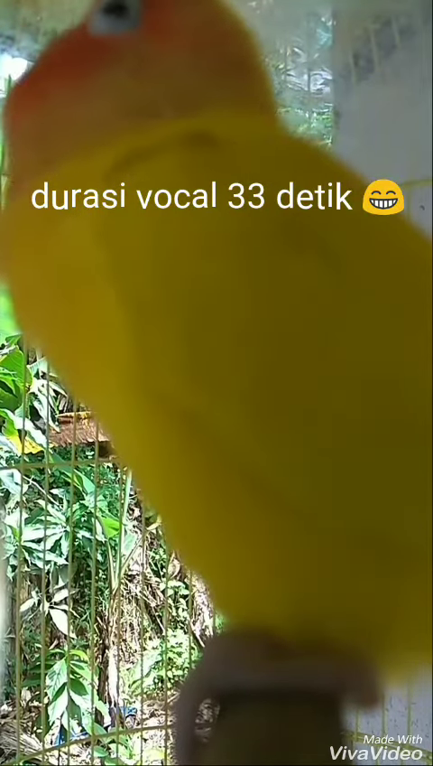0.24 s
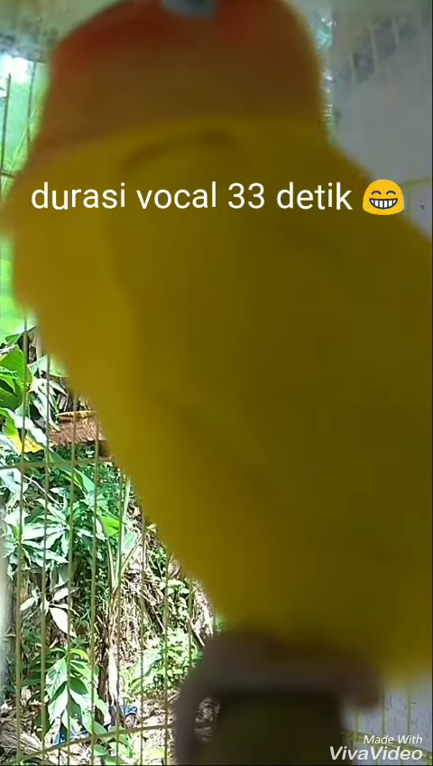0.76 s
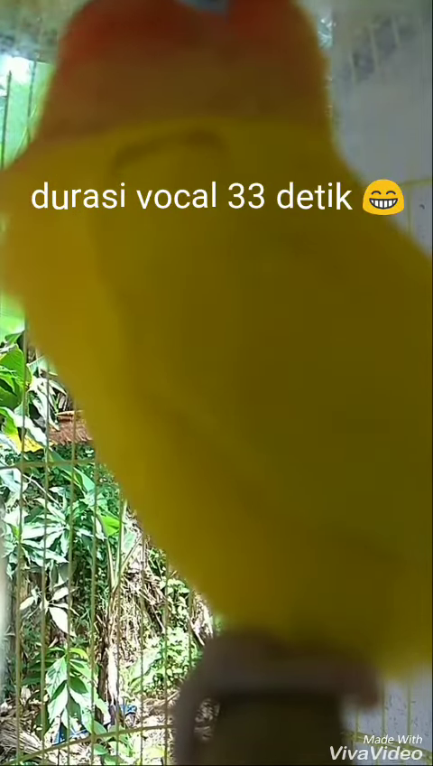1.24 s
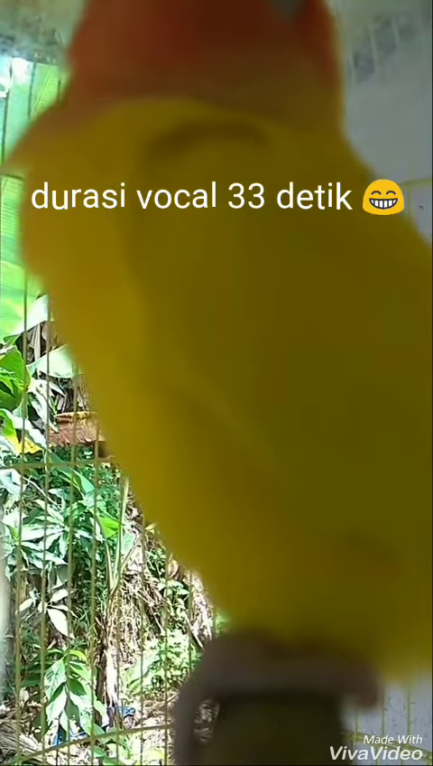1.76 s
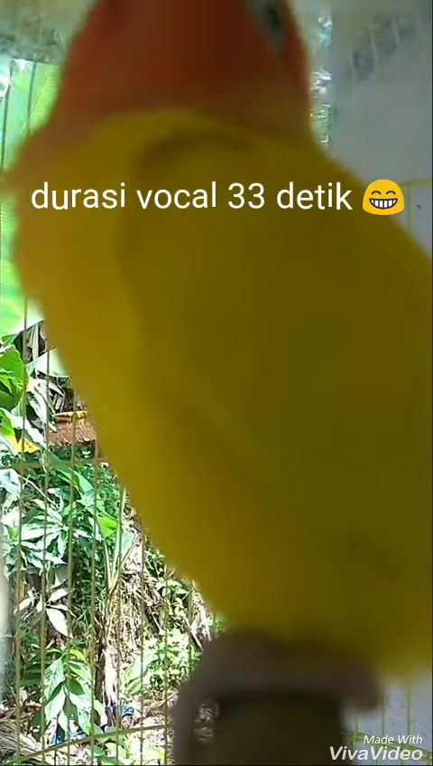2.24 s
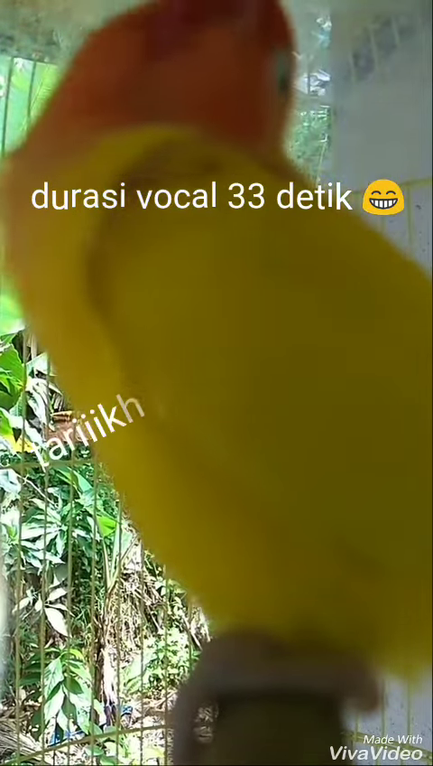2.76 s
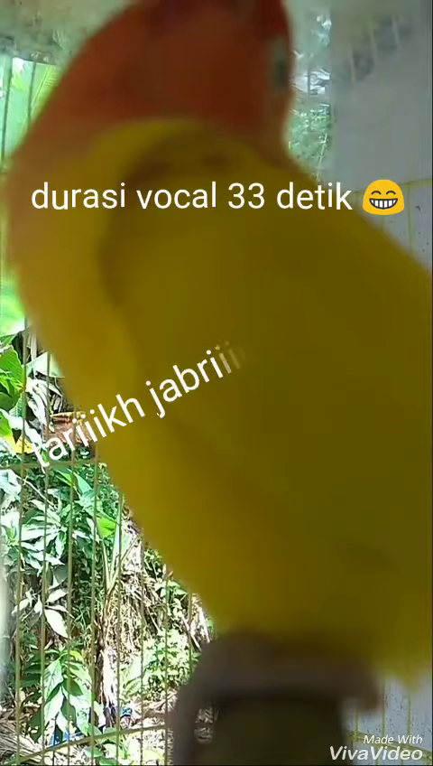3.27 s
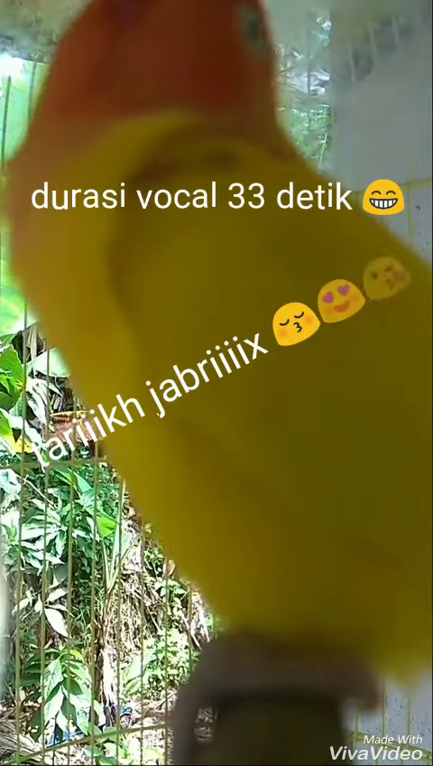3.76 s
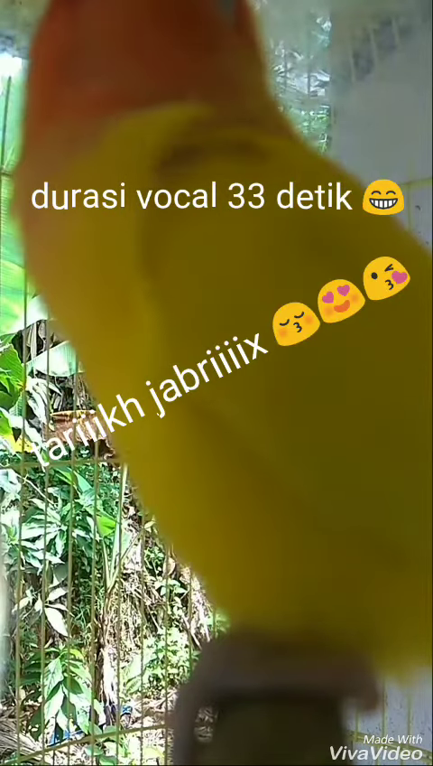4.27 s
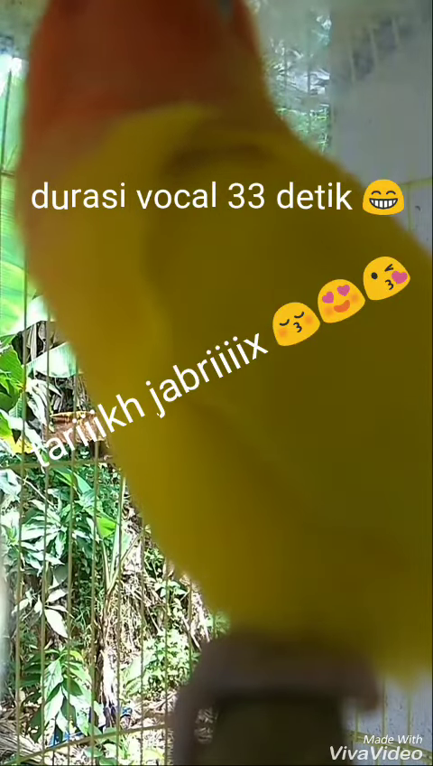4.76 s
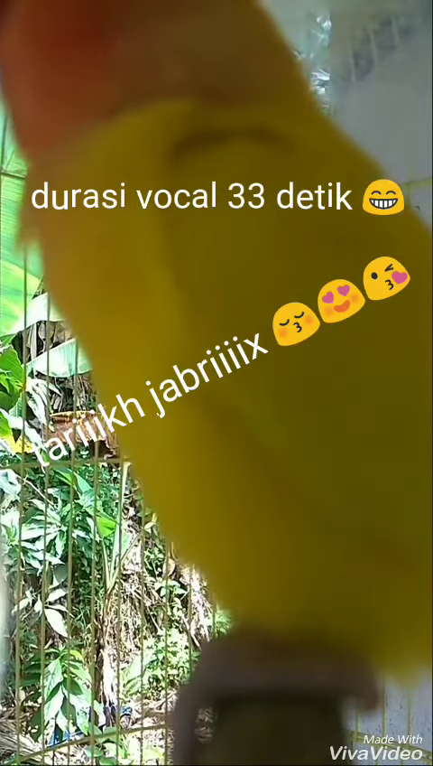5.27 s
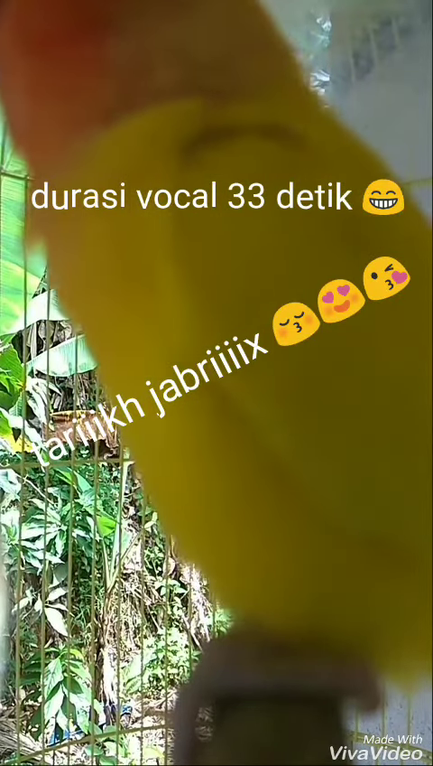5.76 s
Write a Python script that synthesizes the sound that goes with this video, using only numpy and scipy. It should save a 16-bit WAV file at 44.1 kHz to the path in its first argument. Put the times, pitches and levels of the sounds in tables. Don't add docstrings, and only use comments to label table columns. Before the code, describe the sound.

A small parrot right at the microphone rattles out fast, harsh, high chirps about ten a second, slows, then falters into sparse faint ticks.

```python
import sys
import numpy as np
from scipy import signal
from scipy.fft import rfft, irfft, next_fast_len
from scipy.io import wavfile
from scipy.ndimage import uniform_filter1d

SR = 44100
rng = np.random.default_rng(int(sys.argv[2]) if len(sys.argv) > 2 else 0)


def ratio_of_db(decibels):
    return 10 ** (np.asarray(decibels, float) / 20)


def unload_audio(sound):
    columns = np.transpose(np.atleast_2d(sound))
    steps = np.round(np.clip(columns, -1, 1) * 32767)
    wavfile.write(sys.argv[1], SR, steps.astype(np.int16))


N = 265393

# (time [s], scoop [ms], hold [ms], level [dB], jump pitch [Hz])
ARCHES = [
    (-.037, 16.4, 21, -11.5, 4754),
    (0.046, 19.4, 21.8, -12.5, 4780),
    (0.149, 13.7, 18.2, -12, 4728),
    (0.239, 10, 23.5, -13, 4750),
    (.333, 16.4, 22.3, -13, 4795),
    (.434, 11.1, 28.3, -14, 4670),
    (.531, 18, 20, -11.5, 4490),
    (0.632, 11.9, 20.6, -12, 4499),
    (.727, 9, 24, -15, 4987),
]
# (time [s], fall [ms], rest [ms], level [dB], start [Hz])
FALLS = [(0.851, 26, 5.7, -13, 2620), (.940, 30, 10, -14, 2641), (1.038, 20, 14.3, -16.5, 2505),
         (1.131, 26, 5.1, -15.5, 2520), (1.22, 26, 4.1, -11.5, 2632), (1.322, 17, 14.9, -13.5, 2505),
         (1.416, 19, 12.9, -13, 2824), (1.519, 12, 8, -11.5, 2606), (1.615, 19, 3.1, -11.5, 2511),
         (1.700, 20, 5, -11, 2497), (1.792, 18, 8.1, -9, 2620)]
# (time [s], scoop [ms], whistle [ms], level [dB], whistle pitch [Hz])
SNAPS = [
    (1.977, 26.9, 18.5, -10.5, 4350),
    (2.095, 13, 19, -10.5, 4640),
    (2.194, 6.95, 25.9, -10, 4780),
    (2.301, 8.3, 18, -8, 5050),
    (2.399, 12, 17, -10.5, 4830),
    (2.499, 8, 24.2, -10.5, 4600),
    (2.599, 9.8, 29.5, -10.5, 4500),
    (2.715, 10.4, 31.9, -12.5, 4050),
]
# (time [s], scoop start [Hz], scoop chaos [0-1], whistle chaos [0-1])
SNAP_SCOOP = [(1.98, 2450, 0.61, 0.16), (2.099, 2056, 0.61, 0.14), (2.5, 2100, .55, .4),
              (2.62, 2803, 0.39, 0.64), (2.72, 3134, 0.72, .5)]
# (time [s], glide [ms], break and step [ms], level [dB], step pitch [Hz])
STEPS = [(2.823, 22, 22.6, -12, 4416), (2.946, 21.7, 26.06, -14.5, 4337), (3.075, 19.6, 27.7, -13.5, 4177),
         (3.191, 31.3, 30.4, -13.5, 4265), (3.313, 20.3, 33, -13, 4090), (3.442, 22.3, 29, -13, 4105),
         (3.568, 28.8, 21.3, -14, 4052), (3.696, 24.4, 30.5, -16, 4140), (3.842, 24.5, 26.2, -14.5, 3980),
         (3.984, 24.2, 32.2, -16, 3938), (4.126, 23, 13.4, -15, 3830), (4.237, 31.6, 23, -17, 3856),
         (4.379, 30, 24, -17.5, 3910), (4.518, 34.2, 23, -18.5, 3717), (4.66, 20.4, 28.5, -17, 3837),
         (4.813, 35, 21, -14.5, 3892)]
# (time [s], glide start [Hz], glide chaos [0-1], glide level re step [dB], step chaos [0-1])
TIRING = [(2.8, 3329, .3, -2, .25), (3.0, 3350, 0.2, 2, 0.12), (3.3, 3155, 0.25, -3.5, 0.17),
          (3.85, 3242, 0.17, 0, .15), (3.998, 3043, 0.26, -5, .15), (4.55, 2943, 0.42, -1.5, 0.25),
          (4.85, 3043, 0.26, -4, 0.25)]
# (time [s], length [ms], level [dB])
LEADS = [(2.941, 6, -18), (3.433, 7.5, -23.5), (3.832, 11.6, -21), (3.976, 5.9, -23), (4.110, 12.2, -33.5),
         (4.228, 9, -34), (4.362, 10, -37.5), (4.371, 9.1, -22.5), (4.504, 14, -28), (4.648, 10, -17.5),
         (4.802, 7.1, -15.5)]
# (time [s], length [ms], level [dB], pitch [Hz])
TICKS = [(.823, 11.1, -15.5, 2080), (.838, 12, -18, 2080), (.914, 9.6, -13.5, 2210),
         (.926, 17.7, -21.5, 3800), (0.999, 10.5, -22.5, 3900), (1.098, 13.2, -21.5, 1630),
         (1.188, 9.2, -15.5, 1570), (1.388, 4.07, -22, 1600), (1.482, 5.03, -17, 1670),
         (1.584, 4.83, -24, 1700), (1.672, 5.2, -14, 2000), (1.760, 17.6, -20, 1670),
         (1.857, 3.68, -22, 1590), (1.867, 2.8, -11, 2230), (1.883, 10, -12, 3390),
         (1.898, 13.8, -11, 2500)]
# (time [s], length [ms], level [dB], pitch [Hz])
FALTER = [(4.956, 12.5, -19, 2133), (5.019, 3.8, -33, 1595), (5.12, 2.82, -28.5, 1597),
          (5.150, 5.1, -24.5, 1595), (5.229, 7.1, -16, 1655), (5.402, 4, -43, 1636),
          (5.426, 5.6, -25.5, 1397), (5.495, 4.45, -47, 1609), (5.523, 6.2, -21, 1469),
          (5.603, 2.8, -38.5, 1611), (5.631, 4.66, -20.5, 1325), (5.716, 4.5, -41, 1587),
          (5.745, 8.2, -20.5, 1645), (5.844, 4, -35.5, 1610), (5.872, 6.7, -19.5, 1596),
          (5.969, 4.4, -22.5, 1532)]
# (time [s], pitch [Hz], level [dB])
SECOND_VOICE = [(0, 4646, -28), (.78, 4600, -19), (.84, 4600, -33)]
# (frequency [Hz], gain [dB])
THROAT = [(300, -27.5), (1200, -14), (2150, -11), (2700, -8.5), (3400, -1.5), (4600, -9), (5400, -7.5),
          (6000, -12), (6700, -3), (8000, -10.5), (10800, -4.5), (12300, -6.5), (14000, -30.5)]
# (time [s], treble of the facing beak [dB], left minus right low [dB], left minus right high [dB])
HEAD = [(0.0, 3, -4, -4), (0.6, 5.5, -3, -3), (0.9, 3.5, -1.5, -1.7), (1.5, 0, -6, -0.3),
        (1.81, 7, -2, -2.3), (2.11, 1.2, -3, -0.5), (2.41, 7, -5.2, 0.5), (2.71, 0.7, -6.5, 0.7),
        (3.31, 0.5, -10.5, -1), (3.91, -2, -6, -4), (4.51, -6, -6.5, -5), (5.12, 0.5, -5.5, -4.5),
        (5.42, 1, -17, -11.5), (6.02, -0.5, -13.5, -10)]
# (frequency [Hz], gain [dB])
SHADOW = [(4700, 6.5), (5800, -6.5), (7200, 6), (11200, 2.5), (12400, -28)]
# (frequency [Hz], phase [rad])
PORTS = [(0, 0.5), (1720, -4.74), (2410, -2.5), (3530, -1.11), (4650, -1), (5340, -3.5), (6030, -3),
         (7840, -1), (8530, -0.1), (8790, 3), (9730, 4.5), (10700, 4.5), (11400, 5), (13600, -0.86)]
# (time [s], exhaust level [dB], road level [dB])
ENGINE = [(0, -81, -48.5), (.75, -77, -59), (.87, -54, -40), (1.2, -64, -46), (1.8, -64.5, -52),
          (2.5, -98.5, -76), (3.5, -69.5, -77.5), (4.4, -56.5, -50.5), (5.1, -52.5, -49.5),
          (5.3, -55, -55.5), (5.5, -49, -53.5), (6.02, -56, -53)]
# (multiple of the firing rate [-], level [dB])
EXHAUST = [(4, -3), (5, 0), (6, -4.5), (13, -7.5), (15, -13.5), (16, -7.5)]
# (time [s], pitch [Hz], level [dB])
WHINE = [
    (5.35, 333.6, -73),
    (5.5, 337.9, -66.5),
    (6.02, 348.7, -64.5),
]
# (frequency [Hz], gain [dB])
AIR = [(25, 6.5), (100, -1), (400, 9), (1500, -4), (4000, -45), (14000, -7)]

SCOOP_HZ, SCOOP_END_HZ, SCOOP_DB, SCOOP_CHAOS = 2027, 2610, -4.5, 0.58
HOLD_HZ, HOLD_RISE, HOLD_CHAOS = 2668, 1.018, 0.2
JUMP_MS, JUMP_DB, JUMP_CHAOS = 14.5, -0.5, 0.393
SLACK_HZ, FALL_CHAOS = 1815, 0.33
ROUGH_SHARE, ROUGH_DB, ROUGH_CHAOS = 0.33, -2, 0.7
REST_DB, REST_CHAOS = -4.5, 0.41
SNAP_RISE, SNAP_DB, WHISTLE_FADE_DB = 1.18, -3, -3
HOOK_RISE = 1.07
GLIDE_RISE, STEP_RISE = 1.11, 1.03
BREAK_SHARE, BREAK_DB, BREAK_CHAOS = 0.32, -1.5, 0.55
LEAD_HZ, LEAD_RISE, LEAD_CHAOS = 1700, 1.1, 0.36
TICK_HEAD, TICK_HEAD_DB, TICK_END_DB = 0.5, 2, -4
TICK_CHAOS, FALTER_CHAOS = 0.59, 0.496
RELEASE_S, RELEASE_DB = 0.002, -10.5
PORCH_T60_S, PORCH_DB, WALL_S, WALL_DB = 0.32, -15.5, 0.0151, -21
FIRING_HZ, AIR_DB = 32.65, -60.5


def colour(x, shape):
    hz, db = np.transpose(shape)
    size = next_fast_len(x.shape[-1] + 4096)
    f = np.fft.rfftfreq(size, 1 / SR) + 1
    gain = ratio_of_db(np.interp(np.log(f), np.log(hz), db))
    return irfft(rfft(x, size) * gain, size)[..., :x.shape[-1]]


def unit(x):
    return x / np.sqrt(np.mean(x ** 2))


def wobble(hz):
    slow = signal.butter(2, hz, fs=SR, output="sos")
    return unit(signal.sosfilt(slow, rng.standard_normal(N)))


def at(s, table):
    times, *columns = np.transpose(table)
    return [np.interp(s, times, c) for c in columns]


def curves(table):
    return at(np.arange(N) / SR, table)


def smooth(x, ms):
    return uniform_filter1d(uniform_filter1d(x, max(int(ms * SR / 1000), 1)), 20)


def syrinx():
    hz, push, chaos = controls()
    drift = (0.005 + 0.02 * chaos) * wobble(250) + 0.06 * chaos ** 2 * wobble(1500)
    phase = 2 * np.pi * np.cumsum(hz * (1 + drift)) / SR
    throat_hz, throat_db = np.transpose(THROAT)
    tone, power = 0, 1e-9
    for k in np.arange(0.5, 10.1, 0.5):
        size = ratio_of_db(np.interp(np.log(k * hz), np.log(throat_hz), throat_db)) * (k * hz < 15000)
        if k % 1:
            size = size * (0.046 + 0.5 * chaos ** 3.6)
        throb = wobble(353)
        size = size * ratio_of_db((0.6 + 0.7 * k + 2.4 * chaos) * throb)
        jitter = max(k - 1, 0) * 0.29 * np.roll(throb, 999)
        tone = tone + size * np.sin(k * phase + k * k + jitter)
        power = power + uniform_filter1d(size ** 2, 400) / 2
    breath = unit(colour(rng.standard_normal(N), THROAT))
    share = np.clip(0.015 + 0.42 * chaos ** 2.3, 0, 1)
    voice = np.sqrt(1 - share) * tone / np.sqrt(power) + np.sqrt(share) * breath
    flutter = ratio_of_db((0.7 + 2.0 * chaos) * wobble(226))
    return push * flutter * (voice + second_voice())


def second_voice():
    hz, db = curves(SECOND_VOICE)
    phase = 2 * np.pi * np.cumsum(hz * (1 + 0.034 * wobble(333))) / SR
    return ratio_of_db(db + 11.3 * wobble(100)) * (np.sin(phase) + 3.83 * np.sin(2 * phase))


def controls():
    hz, push, chaos = np.full(N, 2000.0), np.zeros(N), np.full(N, 0.5)
    for s, ms, db, hz0, hz1, rough in strokes():
        i, n = max(int(s * SR), 0), max(int(ms * SR / 1000), 9)
        rested = i > 900 and push[i - 900:i].max() == 0
        opens = rested and ms > 15 and hz1 > hz0 > 2900
        hz[i:i + SR // 4] = hz1
        hz[i:i + n] = np.geomspace(hz0, hz1, n)
        chaos[i:i + SR // 4] = np.clip(rough, 0, 0.95)
        swell = np.geomspace(hz0 / hz1, hz1 / hz0, n + 40) ** 0.64
        push[i:i + n + 40] = ratio_of_db(db) * swell * np.sin(np.linspace(0.25, 2.95, n + 40)) ** 0.047
        tail = push[i + n + 40:i + n + 840]
        release = np.exp(-np.arange(len(tail)) / SR / RELEASE_S)
        tail[:] = ratio_of_db(db + RELEASE_DB) * min(ms / 15, 1) * swell[-1] * release
        if opens:
            hz[i - 900:i + 60] = hz0 * np.clip(np.linspace(-0.4, 1, 960), 0.55, 1)
            push[i - 400:i + 200] = push[i + 200] * np.linspace(0.12, 1, 600)
            chaos[i - 900:i] = chaos[i]
    return smooth(hz, 1.2), smooth(push, 1.2), smooth(chaos, 1.5)


def strokes():
    leads = [(s, ms, db, LEAD_HZ, LEAD_HZ * LEAD_RISE, LEAD_CHAOS) for s, ms, db in LEADS]
    ticking = ticks(TICKS, TICK_CHAOS) + ticks(FALTER, FALTER_CHAOS)
    out = arches() + falls() + snaps() + steps() + leads + ticking
    return sorted(stroke for stroke in out if stroke[0] > -0.008)


def chain(s, *parts):
    starts = s + np.cumsum([0] + [part[0] for part in parts]) / 1000
    return [(start, *part) for start, part in zip(starts, parts)]


def arches():
    out = []
    for s, scoop, hold, db, hz in ARCHES:
        out += chain(s, (scoop, db + SCOOP_DB, SCOOP_HZ, SCOOP_END_HZ, SCOOP_CHAOS),
                     (hold, db, HOLD_HZ, HOLD_HZ * HOLD_RISE, HOLD_CHAOS),
                     (JUMP_MS, db + JUMP_DB, hz, hz, JUMP_CHAOS))
    return out


def falls():
    out = []
    for s, fall, rest, db, hz in FALLS:
        clears = hz * (SLACK_HZ / hz) ** ROUGH_SHARE
        out += chain(s, (fall * ROUGH_SHARE, db + ROUGH_DB, hz, clears, ROUGH_CHAOS),
                     (fall * (1 - ROUGH_SHARE), db, clears, SLACK_HZ, FALL_CHAOS),
                     (rest, db + REST_DB, SLACK_HZ, SLACK_HZ, REST_CHAOS))
    return out


def snaps():
    out = []
    for s, scoop, whistle, db, hz in SNAPS:
        low, rough, clear = at(s, SNAP_SCOOP)
        out += chain(s, (scoop, db + SNAP_DB, low, low * SNAP_RISE, rough),
                     (whistle * 0.65, db, hz / HOOK_RISE, hz, clear),
                     (whistle * 0.4, db + WHISTLE_FADE_DB, hz, hz * 1.02, clear))
    return out


def steps():
    out = []
    for s, glide, step, db, hz in STEPS:
        low, rough, under_db, step_chaos = at(s, TIRING)
        top = low * GLIDE_RISE
        out += chain(s, (glide, db + under_db, low, top, rough),
                     (step * BREAK_SHARE, db + BREAK_DB, top, hz * 1.01, BREAK_CHAOS),
                     (step * (1 - BREAK_SHARE), db, hz / STEP_RISE, hz * STEP_RISE, step_chaos))
    return out


def ticks(table, rough):
    out = []
    for s, ms, db, hz in table:
        out += chain(s, (ms * TICK_HEAD, db + TICK_HEAD_DB, hz, hz, rough),
                     (ms * (1 - TICK_HEAD), db + TICK_END_DB, hz, hz * 0.97, rough))
    return out


def ports(voice):
    facing_db, low_db, high_db = curves(HEAD)
    away = np.clip(0.2 - facing_db / 6, 0, 1)
    voice = voice + away * (colour(voice, SHADOW) - voice)
    low = colour(voice, [(5900, 0), (6900, -40)])
    high = voice - low
    side = np.array([[0.5], [-0.5]])
    tilt_db = 0.5 * (facing_db - 0.5)
    pair = low * ratio_of_db(side * low_db - tilt_db / 2) + high * ratio_of_db(side * high_db + tilt_db / 2)
    size = next_fast_len(N + 4096)
    lead = np.interp(np.fft.rfftfreq(size, 1 / SR), *np.transpose(PORTS))
    return irfft(rfft(pair, size) * np.exp(1j * side * lead), size)[:, :N]


def porch(x):
    t = np.arange(SR // 2) / SR
    decay = unit(ratio_of_db(-60 * t / PORCH_T60_S)) * np.clip(t / 0.00073, 0, 1)
    wash = ratio_of_db(PORCH_DB) * decay * rng.standard_normal((2, len(t)))
    bounce = unit(np.exp(-np.abs(t - WALL_S) / 0.001))
    wall = ratio_of_db(WALL_DB) * bounce * rng.standard_normal((2, len(t)))
    echo = colour((wash + wall) / np.sqrt(len(t)), [(1500, -3.5), (2100, 1), (3000, 2), (4500, 2),
                                                    (5800, 4), (7500, 0.5), (12000, 2.5)])
    out = x + signal.fftconvolve(x, echo, axes=1)[:, :N]
    for _ in range(3):
        bars = unit(np.exp(-t[:300] / 0.0012)) * rng.standard_normal((2, 300)) / np.sqrt(300)
        out = out + ratio_of_db(-9) * wobble(5.46) * signal.fftconvolve(x, bars, axes=1)[:, :N]
    return out


def engine():
    thump_db, road_db = curves(ENGINE)
    turn = 2 * np.pi * np.cumsum(FIRING_HZ * (1 + 0.0122 * wobble(3))) / SR
    pulling = np.arange(N) < 5.25 * SR
    hum = 0
    for k, db in EXHAUST:
        level = ratio_of_db(db + 5.8 * wobble(8.4) + thump_db) * (1 if k < 10 else pulling)
        hum = hum + level * np.sin(round(k) * turn)
    gear_hz, gear_db = curves(WHINE)
    gear_turn = 2 * np.pi * np.cumsum(gear_hz) / SR
    gear = sum(ratio_of_db(3 * wobble(8)) * np.sin(k * gear_turn) for k in (2, 3, 4))
    road = unit(colour(rng.standard_normal((2, N)), [(150, 3.5), (400, 1.5), (1200, -1.5), (2500, -11.5)]))
    pan = ratio_of_db(np.array([[3.5], [-3.5]]))
    return pan * (hum + gear * ratio_of_db(gear_db)) + road * ratio_of_db(road_db + 3 * wobble(5))


def garden_air():
    hiss = unit(colour(rng.standard_normal((2, N)), AIR))
    return ratio_of_db(AIR_DB + 0.58 * wobble(4.8)) * hiss


def scene():
    return porch(ports(syrinx())) * ratio_of_db(-2) + engine() + garden_air()


def roll_off(x):
    return signal.sosfilt(signal.butter(12, 14020, fs=SR, output="sos"), x)


def record(dry):
    overtones = colour(dry ** 2, [(20, -32), (150, -12.5), (600, -30), (2000, 18.5)])
    rounded = 1.104 * np.tanh((dry + 0.021 * overtones) / 0.92)
    heard = colour(rounded, [(15, -24.5), (100, -7.5), (5500, 1.5), (6050, 2.5), (6600, -2),
                             (12400, 2.5), (13200, -14), (14000, -78)])
    mix = np.clip(heard, -1, 1)
    return roll_off(mix)


dry = scene()
out = record(dry)
unload_audio(out)
```